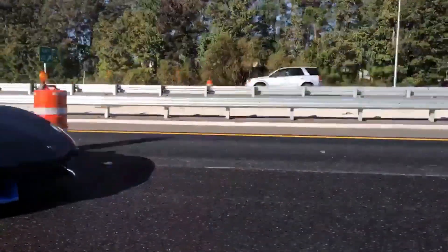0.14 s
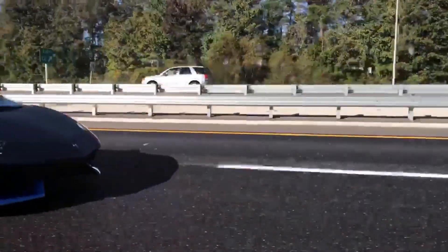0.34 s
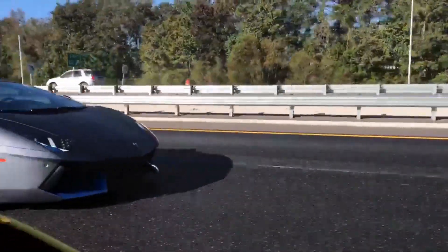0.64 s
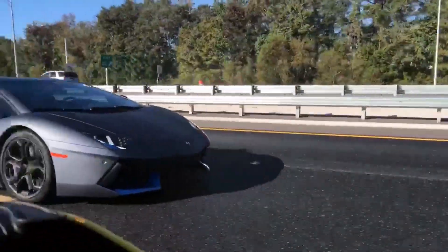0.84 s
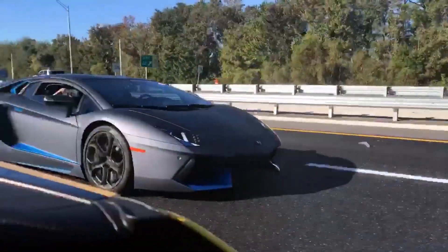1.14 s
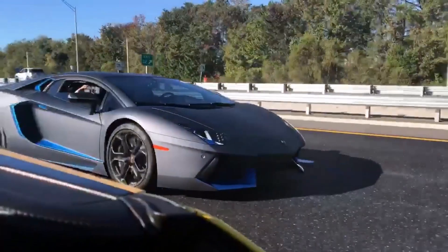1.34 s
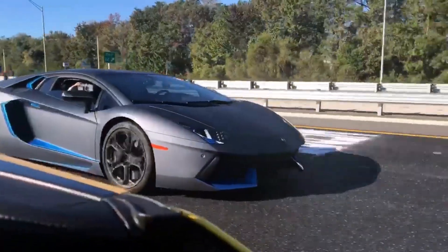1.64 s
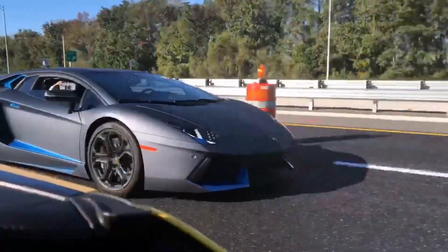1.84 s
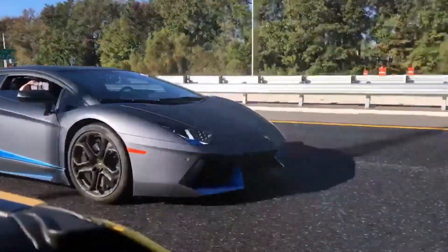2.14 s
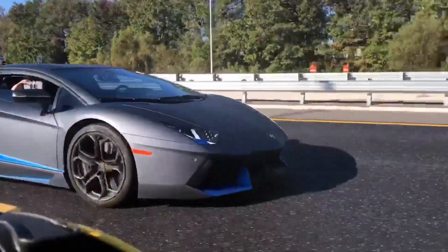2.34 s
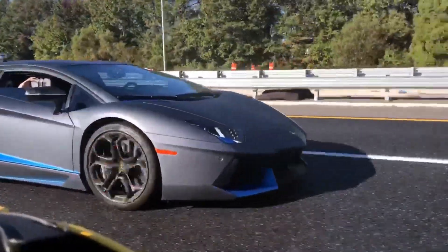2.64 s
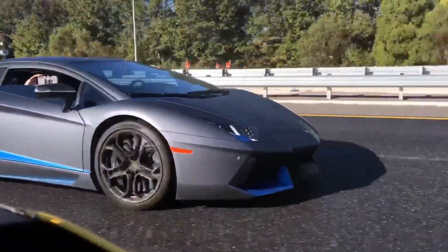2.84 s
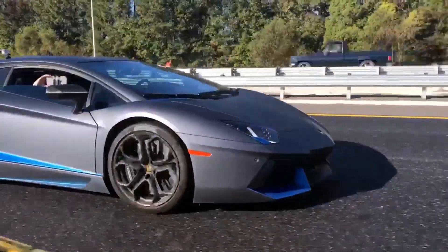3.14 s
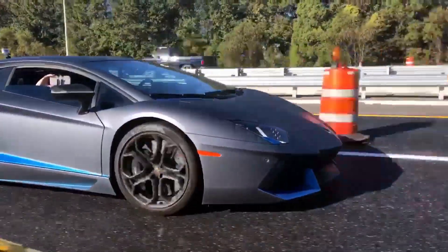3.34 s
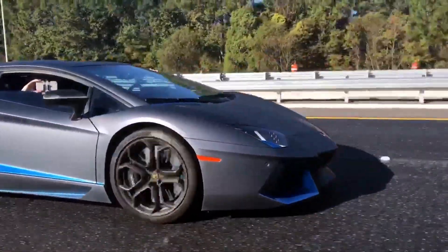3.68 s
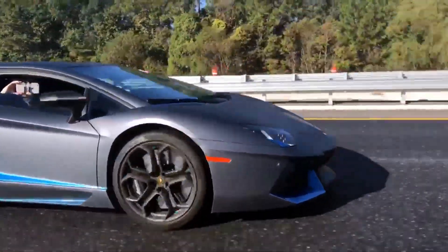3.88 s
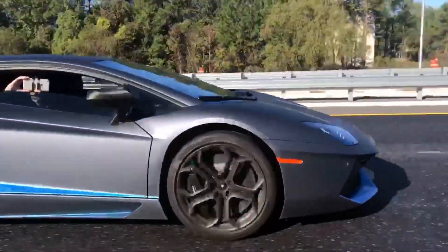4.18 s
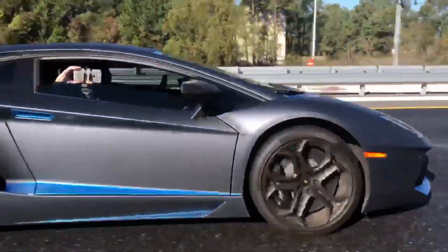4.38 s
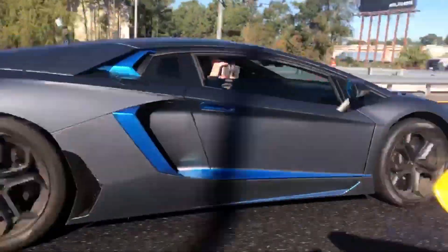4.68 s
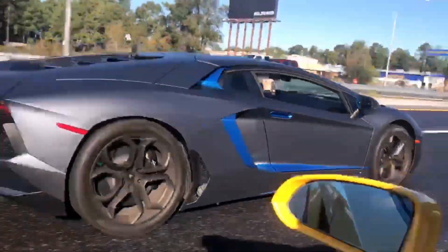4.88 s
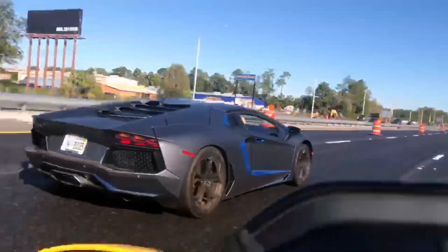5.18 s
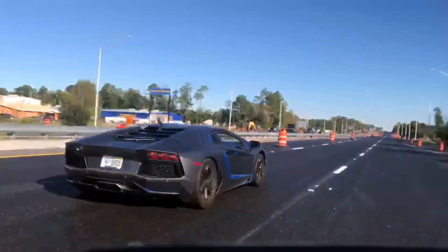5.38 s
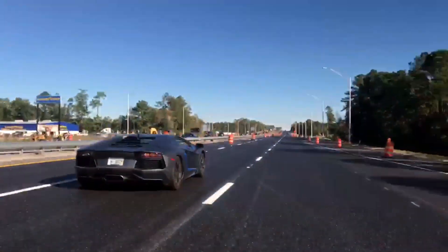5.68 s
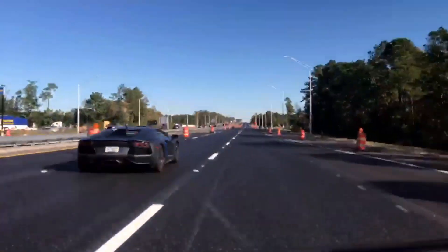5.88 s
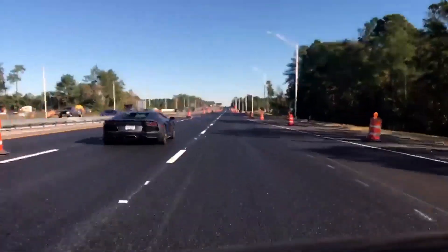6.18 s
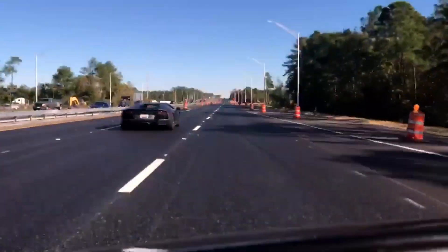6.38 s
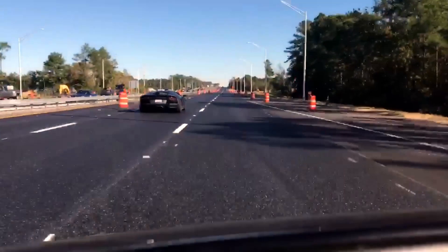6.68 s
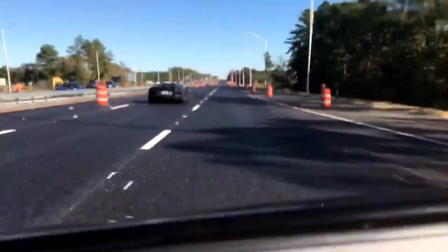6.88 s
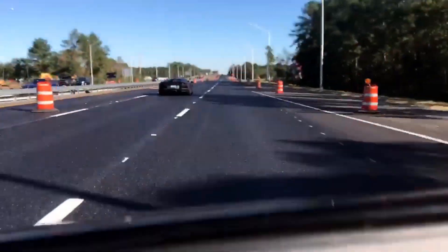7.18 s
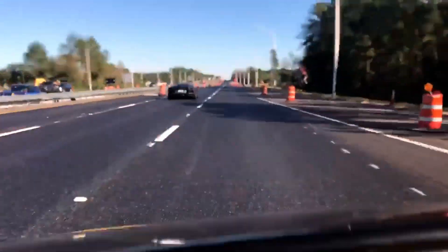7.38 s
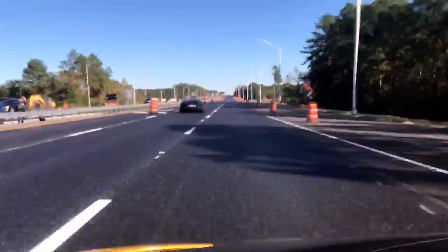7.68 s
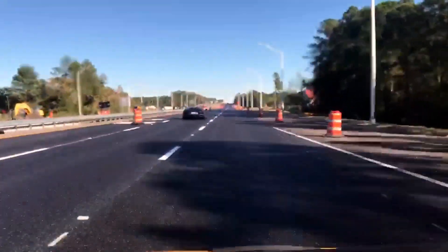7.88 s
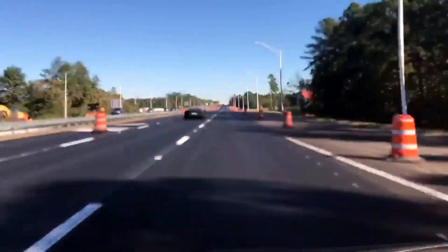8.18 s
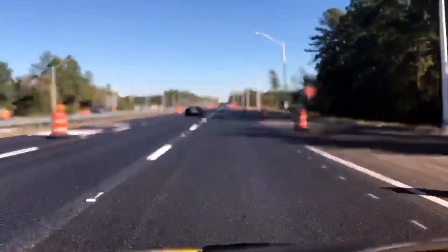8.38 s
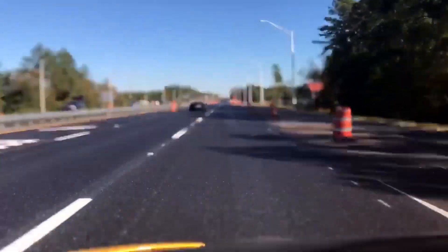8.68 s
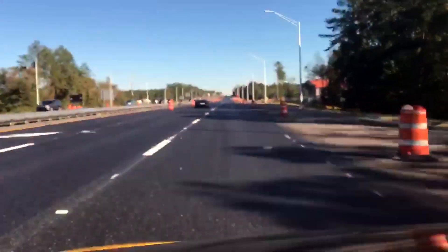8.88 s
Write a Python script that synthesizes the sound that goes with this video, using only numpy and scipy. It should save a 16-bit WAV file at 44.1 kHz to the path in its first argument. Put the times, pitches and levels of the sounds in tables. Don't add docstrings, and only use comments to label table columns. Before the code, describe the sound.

Inside a speeding car, sheltered at first: an even engine hum, boomy air and rough tyre noise, with small bumps and ticks of air. Around three seconds the hum stumbles, the exhaust pops and a downshift blip leaps upward. The engine climbs into a brief scream beside a hissing, roaring passing car. A hard click follows, then open-window wind thumps, flutters and distorts close on the phone microphone.

```python
import sys
import numpy as np
from scipy import signal
from scipy.fft import rfft, irfft, next_fast_len
from scipy.io import wavfile
from scipy.ndimage import uniform_filter1d, minimum_filter1d

SR = 44100
rng = np.random.default_rng(int(sys.argv[2]) if len(sys.argv) > 2 else 0)


def to_linear_factor(level_db):
    exponent = np.asarray(level_db, float) / 20
    return 10 ** exponent


def pcm_store(signal):
    levels = np.round(np.clip(np.atleast_2d(signal), -1, 1) * 32767)
    wavfile.write(sys.argv[1], SR, levels.astype(np.int16).T)


N = 398223
TIME_S = np.arange(N) / SR


def evened(x):
    return x / np.sqrt(np.mean(x ** 2) + 1e-20)


def curves(rows):
    s, *rest = np.transpose(rows)
    since_start_s = TIME_S - s[0] + (s[0] == 0)
    until_end_s = s[-1] - TIME_S + (s[-1] > 9)
    gate = np.clip(np.minimum(since_start_s, until_end_s) / .02, 0, 1)
    return gate, *(np.interp(TIME_S, s, c) for c in rest)


def swells(rows):
    return sum(db * np.exp(-((TIME_S - s) / half_width_s) ** 2) for s, db, half_width_s in rows)


def shaped(x, db_of):
    size = next_fast_len(len(x))
    gain = to_linear_factor(db_of(np.fft.rfftfreq(size, 1 / SR)))
    return irfft(rfft(x, size) * gain, size)[:len(x)]


def noise(points):
    f, db = np.transpose(points)
    white = rng.standard_normal(N)
    return evened(shaped(white, lambda hz: np.interp(np.log(hz + 1), np.log(f + 1), db)))


def band(x, lo_hz, hi_hz):
    sos = signal.butter(2, [lo_hz, min(hi_hz, SR / 2.2)], "band", fs=SR, output="sos")
    return signal.sosfilt(sos, x)


def chance(top_hz, slope_db):
    step = 32
    coarse = N // step + 2
    hz = np.fft.rfftfreq(coarse, step / SR)
    gain = ((hz > 2) & (hz < top_hz)) * to_linear_factor(slope_db * np.log2(hz + 1))
    wander = irfft(rfft(rng.standard_normal(coarse)) * gain, coarse)
    return np.interp(np.arange(N) / step, np.arange(coarse), evened(wander))


def pulse(t, rise_s):
    return t / rise_s * np.exp(1 - t / rise_s)


def add(mix, s, sound):
    part = mix[round(s * SR):][:len(sound)]
    part += sound[:len(part)]


# start_s, level_db
WIND_STRENGTH = [(0.0, -28), (1.2, -34.5), (2.5, -29), (2.6, -26.5), (3.0, -28.5), (3.55, -20.5),
                 (3.95, -32), (4.2, -37.5), (4.35, -25), (5.22, -30.5), (5.29, -16), (5.5, -19.5),
                 (6.68, -16.5), (6.77, -8), (7.1, -9.5), (8.2, -9.5), (8.4, -9.5), (9.03, -8.5)]


def wind():
    turn_s, turn_length_s = 5.25, 0.045
    return curves(WIND_STRENGTH)[1], np.clip((TIME_S - turn_s) / turn_length_s, 0, 1)


# centre_s, change_db, half_width_s
GUST_SWELLS = [(0.35, -3, 0.039), (1.43, -3.5, 0.015), (1.76, 5, 0.04), (2.21, -1, 0.037), (3.07, 9, 0.011),
               (3.32, 3, 0.073), (3.425, 5, 0.016), (3.64, -0.5, 0.025), (3.59, -3, 0.02), (4.82, 7, 0.022),
               (4.93, 2.5, .05), (6.21, -5, 0.016), (6.44, -5, .02), (6.64, -14, 0.014), (8.0, 8, 0.017),
               (8.33, 5, 0.034)]


def gusty_wind_db():
    return wind()[0] + swells(GUST_SWELLS)


# freq_hz, density_db_per_hz
ROAD_SPECTRUM = [(150, -18.5), (260, -8.5), (293, -14.5), (527, -15.5), (616, -15.5), (964, -22),
                 (1760, -38.5), (2530, -40.5), (4870, -51), (13000, -60.5), (16000, -68)]


def road(gusty_db):
    exposed = wind()[1]
    road_db = -27.5 + 0.46 * (gusty_db + 29.5) - 3 * exposed
    roar = noise(ROAD_SPECTRUM) * to_linear_factor(0.83 * chance(110, -1.6))
    roar = roar / np.std(band(roar, 515, 776))
    treble = shaped(roar, lambda hz: -20 * np.log10(1 + (1800 / (hz + 1)) ** 4))
    treble_db = -28.5 + 0.32 * (road_db + 29.0) - 8.8 * exposed
    return to_linear_factor(road_db - 4.5) * (roar - treble) + to_linear_factor(treble_db) * treble


# freq_hz, density_db_per_hz
BOOM_SPECTRUM = [(8.8, -54), (15, -26), (29, -15), (49, 6), (114, -5.5), (151, -3.5), (194, -11.5),
                 (200, -7), (260, -46), (440, -120)]
# freq_hz, density_db_per_hz
BUFFET_SPECTRUM = [(8.8, -55), (15, -44), (27, -18.5), (70, -2), (124, -4), (226, -7), (278, -11),
                   (451, -24), (500, -39), (650, -18), (1100, -120)]


def buffeting(gusty_db):
    exposed = wind()[1]
    boom = np.sqrt(1 - exposed) * noise(BOOM_SPECTRUM)
    buffet = np.sqrt(exposed) * to_linear_factor(2.5) * noise(BUFFET_SPECTRUM)
    return to_linear_factor(gusty_db + 2.35 * chance(40, 0.77)) * (boom + buffet)


def eddy_flutter():
    snaps_per_s, snap_s, snap_size = 120, 0.00066, 2.2
    u = np.arange(600) / SR / snap_s
    bursts = (rng.random(N) < snaps_per_s / SR) * rng.exponential(1, N)
    snaps = snap_size * signal.oaconvolve(bursts, np.exp(-u) * np.minimum(4 * u, 1))[:N]
    return 3.6 * np.tanh((.85 * chance(500, -.4) + snaps) / 3.6)


# freq_hz, density_db_per_hz
STREAM_SPECTRUM = [(180, -24), (300, -0.5), (455, -6), (537, -4.5), (828, -12.5), (885, -10), (2100, -20),
                   (3950, -27), (6200, -35.5), (10600, -43.5), (12700, -61), (16000, -59.5)]
# start_s, facing_db
PORT_FACING = [(5.2, 6.5), (5.5, 2), (5.8, -1), (6.25, -6.5), (6.55, -1.5), (7.05, 3.5), (7.4, 2.5),
               (8.3, 2), (8.6, 7), (9.03, 7.5)]
# centre_s, treble_db, half_width_s
SHARP_EDDIES = [(5.81, 2.5, 0.0077), (6.61, 4, 0.005), (6.68, 15.5, 0.0046), (7.07, 7, .03),
                (8.07, 14.5, 0.0083), (8.5, 0.5, 0.3)]


def rush():
    wind_db, exposed = wind()
    facing_db = curves(PORT_FACING)[1]
    level_db = -23 + 0.41 * facing_db
    bright_db = 0.83 * facing_db + chance(60, 0) + swells(SHARP_EDDIES)
    body_db = 0.38 * (wind_db + 11)
    source, flutter, out = noise(STREAM_SPECTRUM), eddy_flutter(), np.zeros(N)
    # lo_hz, hi_hz, depth_db, share of bright_db (0: the body, which follows the wind)
    bands = [(250, 1200, 2.2, 0), (1200, 3000, 5, .2), (3000, 6500, 6.6, .5),
             (6500, 10500, 7, .8), (10500, 19000, 7.6, .9)]
    for lo_hz, hi_hz, depth_db, share in bands:
        swing = evened(to_linear_factor(depth_db * (flutter + .2 * chance(300, -.4))))
        part = band(band(source, lo_hz * .7, hi_hz * 1.4), lo_hz, hi_hz)
        out += part * swing * to_linear_factor(share * bright_db if share else body_db)
    top_hiss = to_linear_factor(-63) * evened(band(rng.standard_normal(N), 8000, 17000))
    return np.sqrt(exposed) * (to_linear_factor(level_db) * out / np.std(band(source, 1400, 4500)) + top_hiss)


# start_s, peak_db
AIR_BUMPS = [(1.48, -8), (2.28, -3), (2.568, -6.5), (3.06, 5.5), (3.169, -14), (3.326, -3.5), (4.442, 0.5),
             (4.599, -6.5), (4.641, -10), (4.736, -3.5), (4.81, -5), (4.942, -5.5)]


def bumps():
    out, t = np.zeros(N), np.arange(3000) / SR
    start_hz = 239
    turns = start_hz * 0.011 * (1 - np.exp(-t / 0.0096))
    for s, db in AIR_BUMPS:
        add(out, s, to_linear_factor(db - 3.5) * np.sin(2 * np.pi * turns) * np.exp(-(t / 0.0043) ** 2))
    return out


# start_s, peak_db
AIR_TICKS = [(0.178, -34.5), (0.195, -34.5), (0.2379, -35), (0.252, -38), (1.6147, -40), (2.6245, -38),
             (3.204, -26), (3.2142, -23), (3.617, -35), (3.627, -36), (4.646, -38), (5.8371, -35.5)]


def ticks():
    out, t = np.zeros(N), np.arange(3000) / SR
    for s, db in AIR_TICKS:
        puff = rng.standard_normal(len(t)) * pulse(t, 0.0039)
        add(out, s, to_linear_factor(db - 4.0) * band(puff, 3200, 10500))
    return out


# start_s, peak_db, lowest_hz, rise_s
GRIT_CLICKS = [
    (0.522, -36, 3000, .001),
    (4.703, -36, 7000, .003),
    (4.976, -33, 9000, .003),
    (5.442, -15, 2500, .0007),
]


def clicks():
    out, t = np.zeros(N), np.arange(3000) / SR
    for s, db, lo_hz, rise_s in GRIT_CLICKS:
        click = rng.standard_normal(len(t)) * pulse(t, rise_s)
        add(out, s, to_linear_factor(db) * band(click, lo_hz, 16000))
    return out


# freq_hz, density_db_per_hz
EXHAUST_SPECTRUM = [(760, -11.5), (1300, 1.5), (1640, -0.5), (1760, 1), (2890, -4.5), (3420, -5.5),
                    (5090, -15.5), (5960, -15), (14300, -21.5), (16000, -31)]
# start_s, level_db
EXHAUST_HISS_LEVEL = [(3.8, -54.5), (4.72, -41), (5.02, -34.5), (5.36, -32), (5.45, -38), (5.82, -46.5), (6.1, -64)]
# start_s, crank_hz, level_db
PULL_CURVE = [(3.66, 100.2, -30), (3.75, 98.5, -18.5), (3.86, 112.0, -20.5), (4.02, 109.9, -19),
              (4.5, 128.7, -18.5), (4.9, 144.6, -23), (5.2, 154.5, -21), (5.5, 164.5, -26),
              (6.5, 197.0, -31)]


def exhaust_hiss():
    crank_turns = np.cumsum(curves(PULL_CURVE)[1]) / SR
    gate, hiss_db = curves(EXHAUST_HISS_LEVEL)
    puff_db = 1.5 * np.cos(2 * np.pi * crank_turns) + 1.7 * np.cos(8 * np.pi * crank_turns)
    puffs = evened(to_linear_factor(puff_db + 1.24 * chance(180, -1.6)))
    hiss = noise(EXHAUST_SPECTRUM)
    return gate * to_linear_factor(hiss_db - 5.5) * hiss * puffs / np.std(band(hiss, 8300, 14200))


def tone(turns, db):
    waver_db = .9 * chance(30, -2)
    return np.sqrt(2) * to_linear_factor(db + waver_db) * np.sin(2 * np.pi * (turns + rng.random()))


def firing_line(rows):
    gate, hz, db = curves(rows)
    turns = np.cumsum(hz) / SR
    return gate * (tone(turns, db) + tone(2 * turns, db - 35))


# start_s, firing_hz, level_db
DRONE_LINE = [(0.0, 230.4, -15.5), (0.64, 232.8, -16), (1.6, 239.6, -15.5), (2.3, 244.9, -17),
              (2.49, 243.7, -18.5), (2.9, 241.0, -16.5), (3.24, 240.3, -17.5), (3.33, 236.2, -19),
              (3.41, 228.3, -19)]
# centre_s, change_db, half_width_s
DRONE_STUMBLES = [
    (1.62, -8, 0.011),
    (3.12, 0.5, .02),
    (3.305, -16, 0.035),
    (3.38, -12, 0.009),
]


def drone():
    return to_linear_factor(swells(DRONE_STUMBLES)) * firing_line(DRONE_LINE)


# start_s, firing_hz, level_db
BLIP_LINE = [(3.39, 230.3, -36), (3.412, 236.6, -6.5), (3.432, 232.5, -18.5), (3.468, 261, -7.5),
             (3.502, 324, -19.5), (3.538, 355, -15), (3.568, 434, -17), (3.62, 423, -53)]
# start_s, firing_hz, level_db
LINGER_LINE = [(3.49, 238, -26), (3.54, 250, -23), (3.58, 237, -22), (3.62, 247, -21), (3.66, 247, -23),
               (3.7, 263, -21), (3.76, 263, -27)]
# start_s, pitch_hz, level_db
BITE_LINE = [(3.67, 322, -28), (3.7, 327, -22), (3.74, 333, -20), (3.78, 335, -27)]


def downshift():
    return firing_line(BLIP_LINE) + firing_line(LINGER_LINE) + firing_line(BITE_LINE)


# crank_order, relative_db (7.31: gear whine)
ORDER_LEVELS = [(1, -19), (2, -17), (3, -4), (4, 0), (5, -22), (6, -21), (7, -25), (8, -21), (7.31, -30),
                (9, -26), (10, -23.5), (11, -27)]
# crank_order, centre_s, half_width_s, peak_db
ORDER_BEAMS = [(1, 5.0, .2, -27), (2, 3.78, .05, -28), (2, 4.65, .08, -27), (2, 4.92, .1, -19.5),
               (2, 5.08, .17, -21), (3, 4.85, .25, -26), (4, 5.15, .12, -19), (4, 6.0, .45, -28.5),
               (5, 5.35, .15, -30), (6, 4.72, .17, -25.5), (6, 5.1, .3, -33), (7, 4.48, .09, -31),
               (7, 5.12, .13, -24), (7, 5.3, .25, -27), (8, 4.63, .08, -35), (8, 4.98, .12, -27),
               (8, 5.2, .25, -28), (7.31, 4.05, .25, -32.5), (7.31, 5.1, .25, -38), (9, 5.05, .3, -35),
               (11, 5.2, .22, -27)]
# crank_order, peak_db
SCREAM_ORDERS = [(12, -45), (13, -42), (14, -35), (15, -34), (16, -32), (17, -42), (18, -40), (20, -39),
                 (22, -34.5), (26, -40)]


def pull():
    gate, crank_hz, level_db = curves(PULL_CURVE)
    turns, exposed = np.cumsum(crank_hz) / SR, wind()[1]
    power = {k: to_linear_factor(2 * (level_db + db)) for k, db in ORDER_LEVELS}
    for k, s, half_width_s, db in ORDER_BEAMS:
        beam = to_linear_factor(2 * db) * np.exp(-2 * ((TIME_S - s) / half_width_s) ** 2)
        power[k] = power.get(k, 1e-9) + beam
    lines = sum(tone(k * turns, 10 * np.log10(p)) for k, p in power.items())
    scream_s, scream_half_width_s = 5.23, .2
    swell = np.exp(-((TIME_S - scream_s) / scream_half_width_s) ** 2) * to_linear_factor(-5 * exposed)
    scream = swell * sum(tone(k * turns, db) for k, db in SCREAM_ORDERS)
    shake_db = 1.2 * exposed * chance(59, -1.5)
    return gate * (lines + scream) * to_linear_factor(shake_db)


# start_s, peak_db, ring_hz, treble_db, rise_s
EXHAUST_POPS = [(2.281, -20, 1030, -53, 0.0014), (3.0577, -7.5, 910, -51, 0.00097),
                (3.278, -21, 1150, -46, 0.0012), (3.313, -10, 705, -35, 0.0022),
                (3.32, -9.5, 1090, -33, 0.001), (3.323, -13, 1020, -42, 0.001),
                (3.347, -21, 1380, -48, 0.0012), (3.353, -20, 810, -51, 0.0017),
                (3.364, -15, 800, -53, 0.0014), (3.371, -20, 900, -53, 0.0022),
                (3.433, -14, 790, -56, 0.0014), (3.463, -14, 1510, -49, 0.0016),
                (3.515, -20, 1010, -48, 0.0016), (3.526, -14, 706, -52, 0.0015),
                (3.788, -19, 1180, -52, 0.0014), (3.8, -23, 1080, -55, 0.002),
                (3.87, -23, 1010, -48, 0.0011), (4.631, -11.5, 700, -27.5, 0.0011)]


def pops():
    out, t = np.zeros(N), np.arange(3000) / SR
    for s, db, ring_hz, treble_db, rise_s in EXHAUST_POPS:
        grit = rng.standard_normal(len(t))
        body = evened(band(band(grit, 350, 2000), 350, 2000))
        treble = evened(band(band(grit, 2400, 6000), 2400, 6000))
        ring = np.sin(2 * np.pi * ring_hz * t) + 0.64 * body
        add(out, s, pulse(t, rise_s) * (to_linear_factor(db - 1.5) * ring + to_linear_factor(treble_db + 1.5) * treble))
    return out


def scene():
    gusty_db = gusty_wind_db()
    air = road(gusty_db) + buffeting(gusty_db) + rush()
    knocks = bumps() + ticks() + clicks()
    engine = drone() + downshift() + pull() + pops()
    return (air + knocks + exhaust_hiss() + engine)[None]


def band_limit(x):
    return signal.sosfilt(signal.butter(12, 16430, fs=SR, output="sos"), x)


# centre_hz, width_hz, change_db
PORT_RESPONSE = [(4930, 250, -2.5), (7650, 600, -2.5), (10560, 860, -6)]


def record(dry):
    def port_db(hz):
        dips_db = sum(db * np.exp(-((hz - f) / width) ** 2) for f, width, db in PORT_RESPONSE)
        return dips_db - 60. * (hz > 15830)

    coloured = shaped(dry[0], port_db)
    room_left = np.minimum(.8 / (abs(coloured) + 1e-9), 1)
    gain = uniform_filter1d(minimum_filter1d(room_left, size=177), size=89)
    return band_limit((coloured * gain)[None])


dry = scene()
out = record(dry)
pcm_store(out)
```